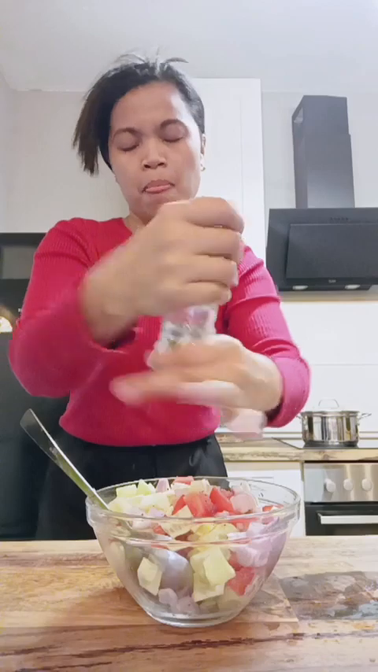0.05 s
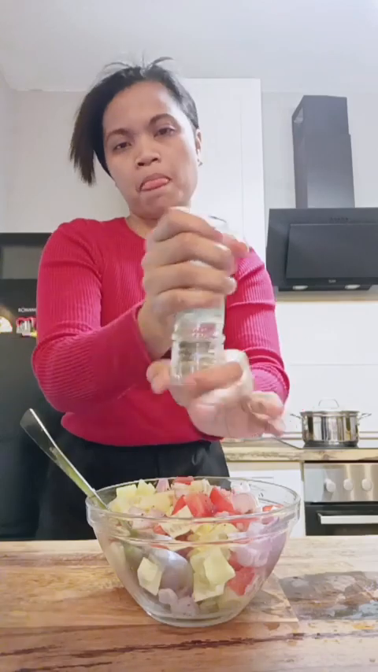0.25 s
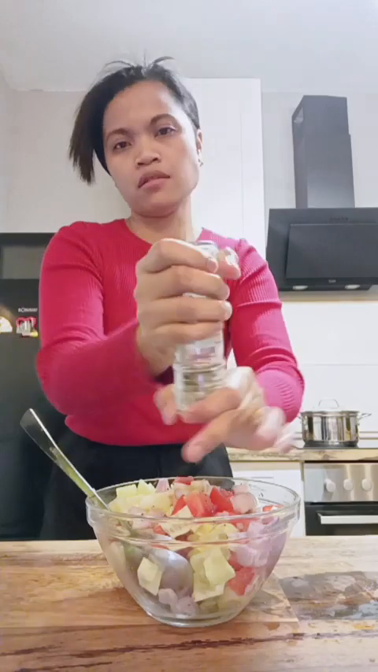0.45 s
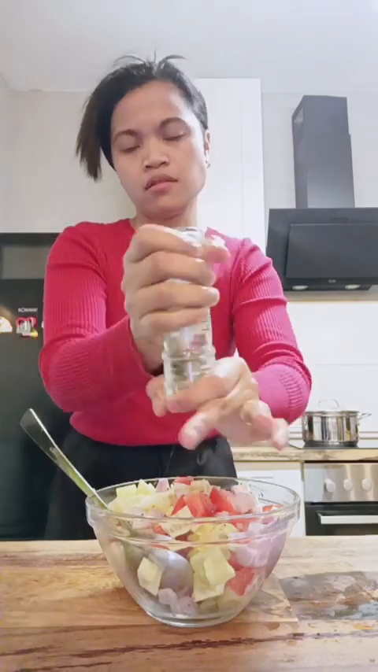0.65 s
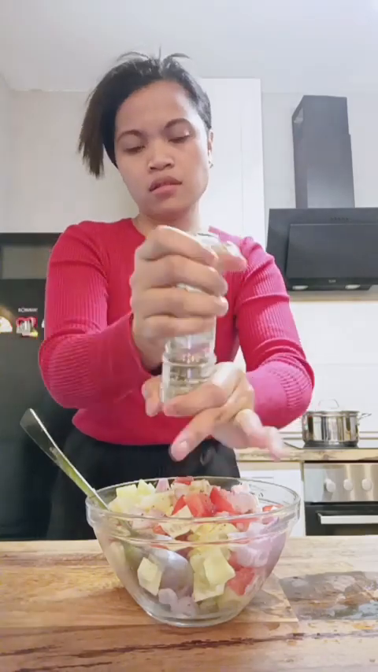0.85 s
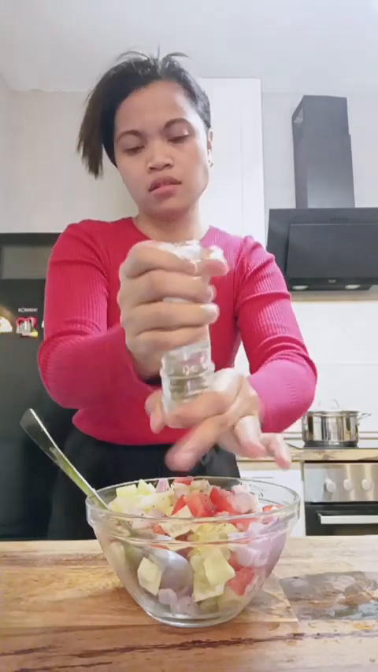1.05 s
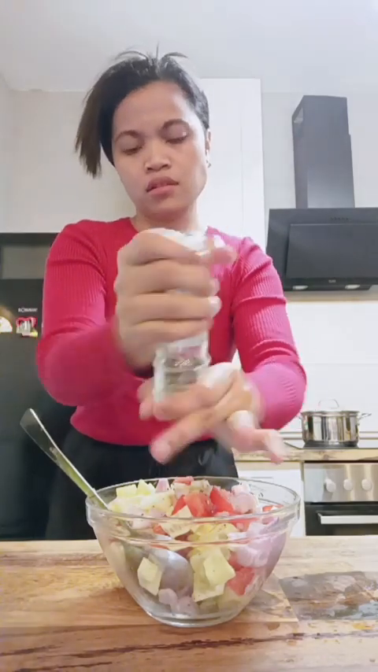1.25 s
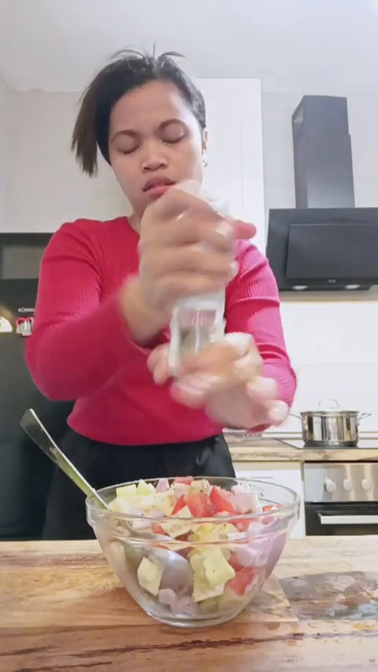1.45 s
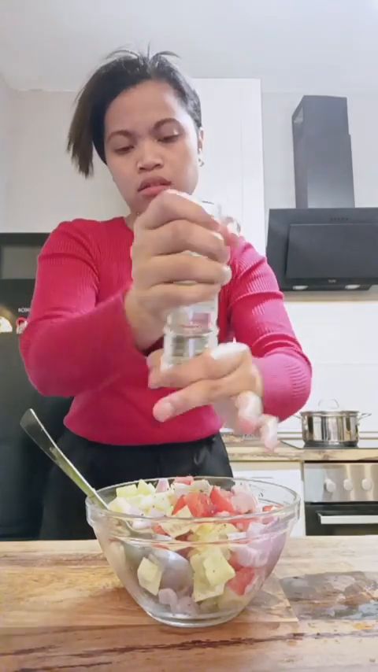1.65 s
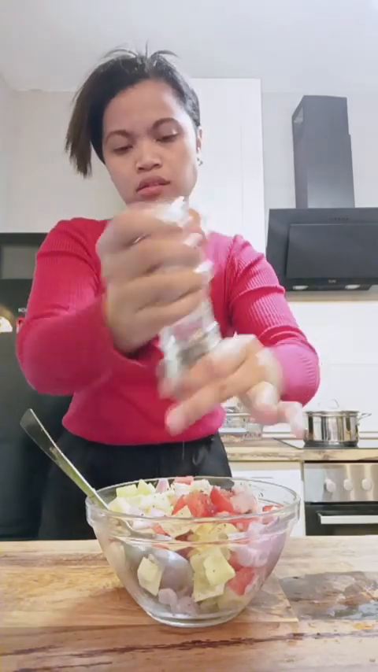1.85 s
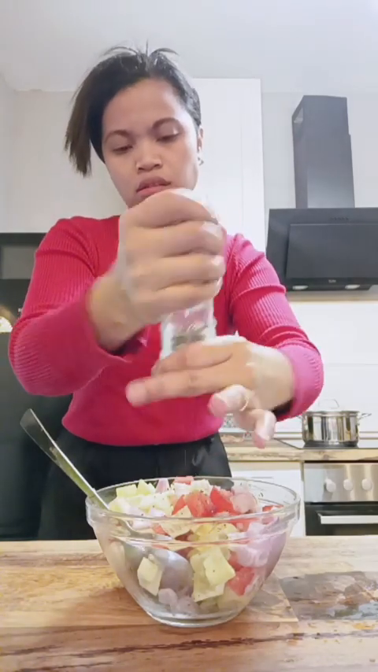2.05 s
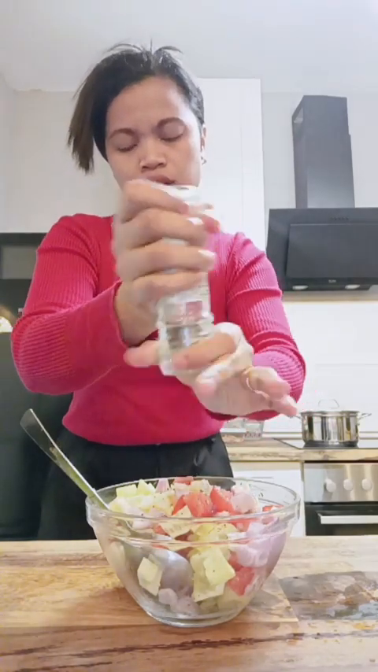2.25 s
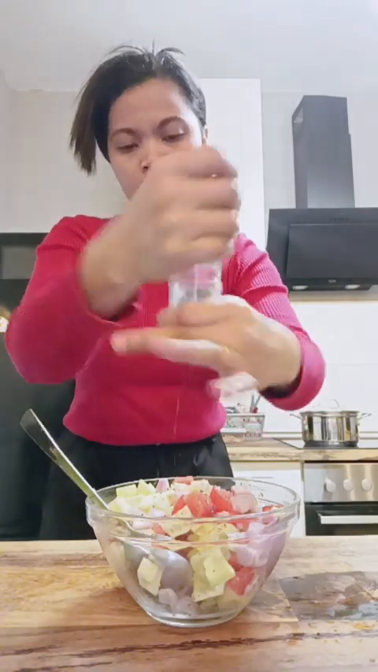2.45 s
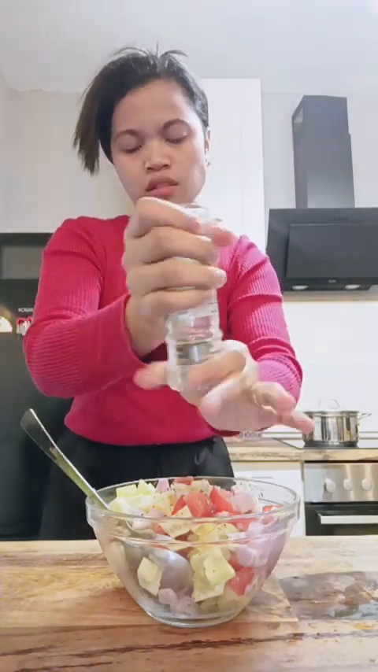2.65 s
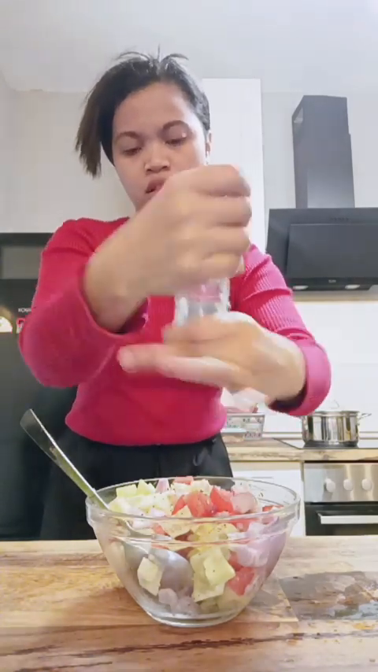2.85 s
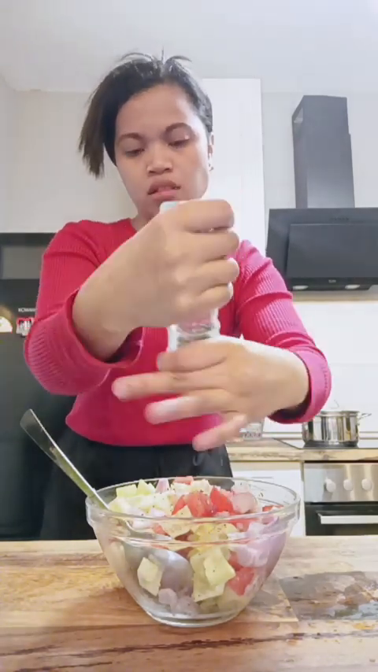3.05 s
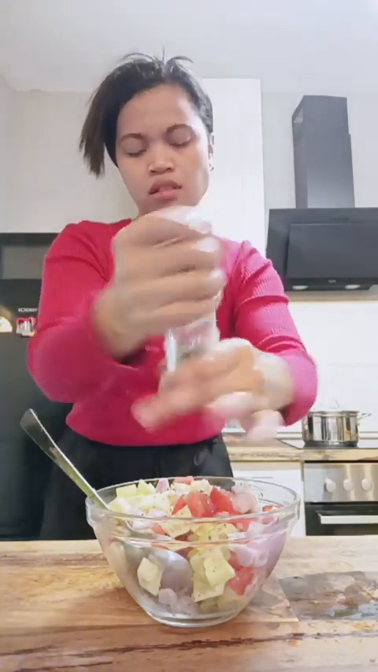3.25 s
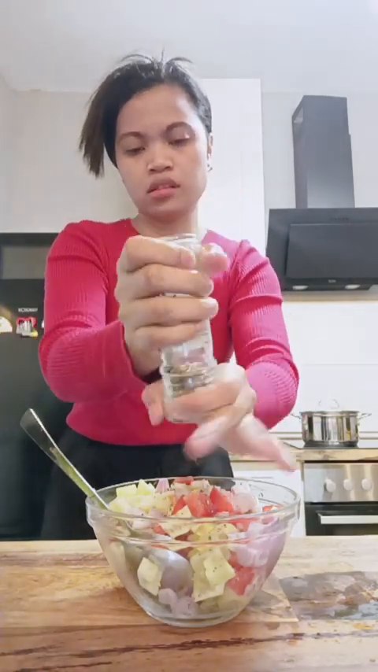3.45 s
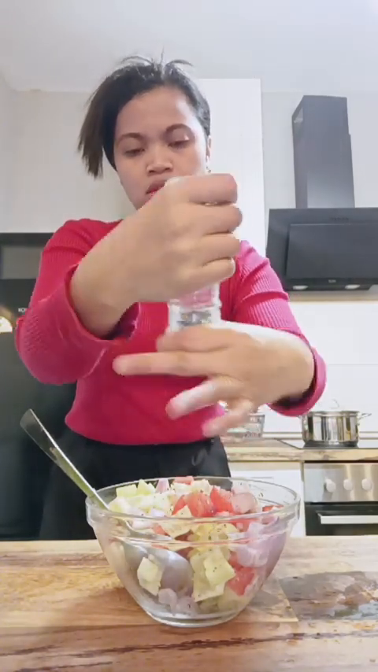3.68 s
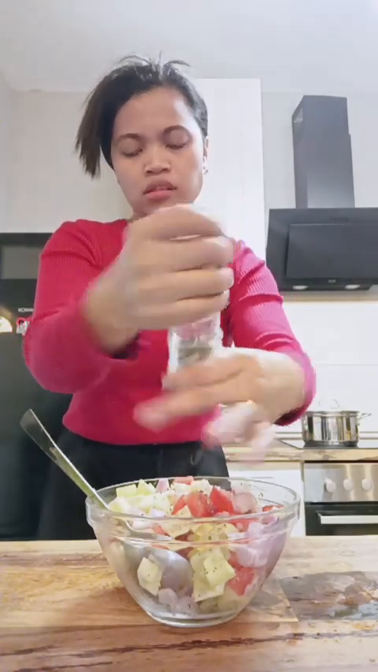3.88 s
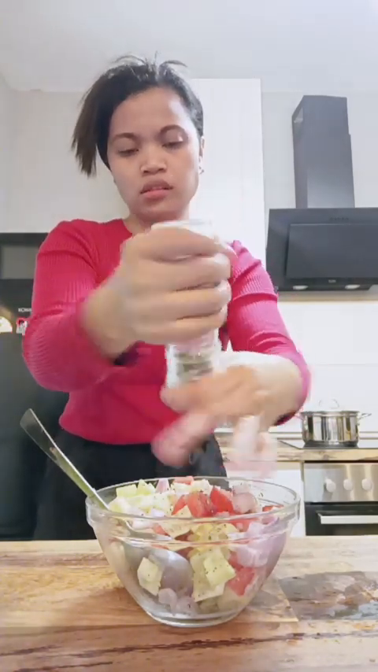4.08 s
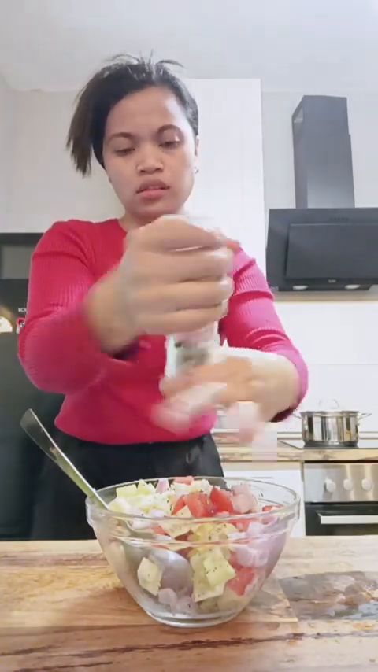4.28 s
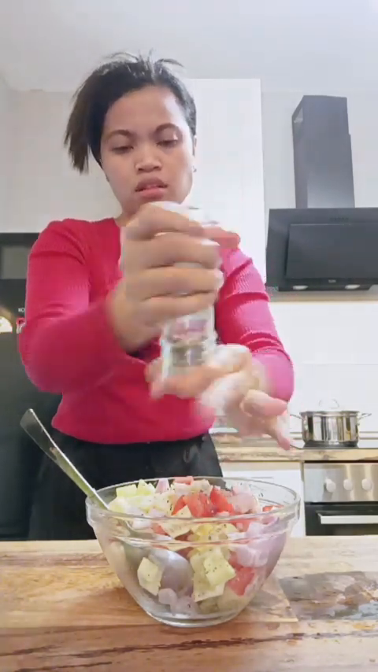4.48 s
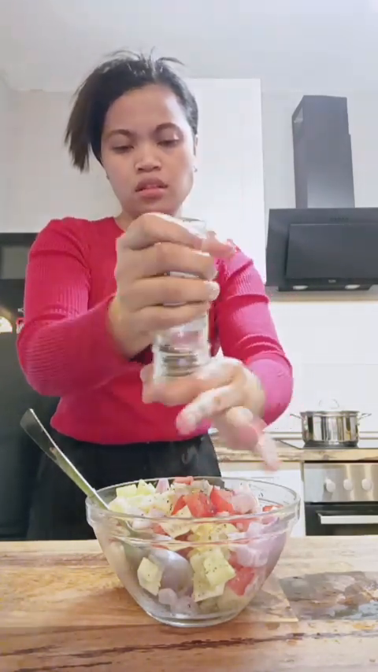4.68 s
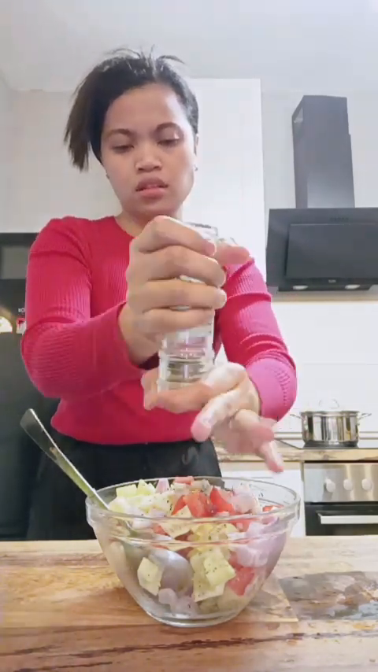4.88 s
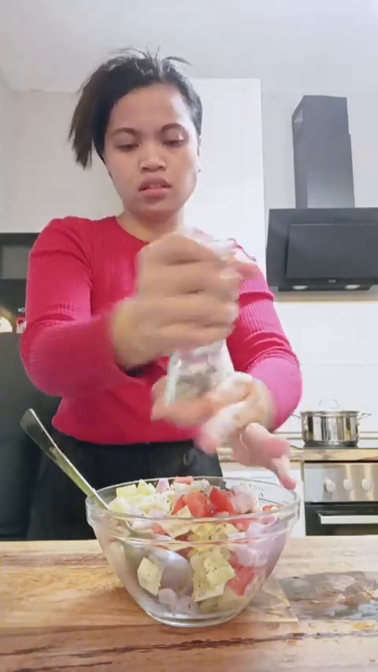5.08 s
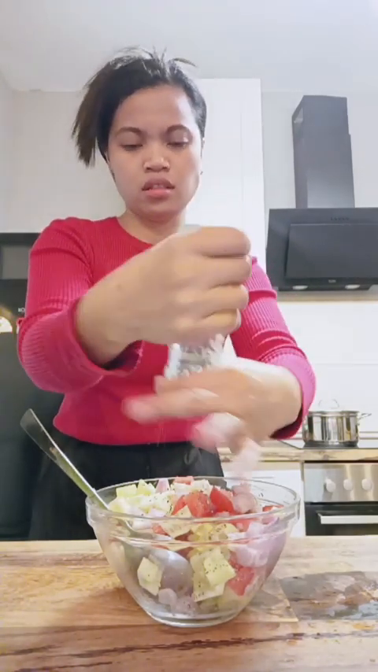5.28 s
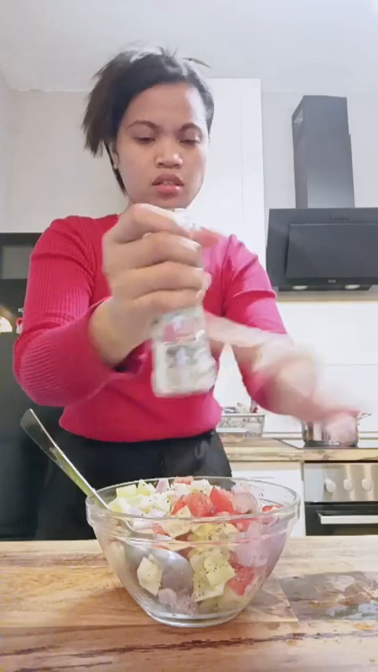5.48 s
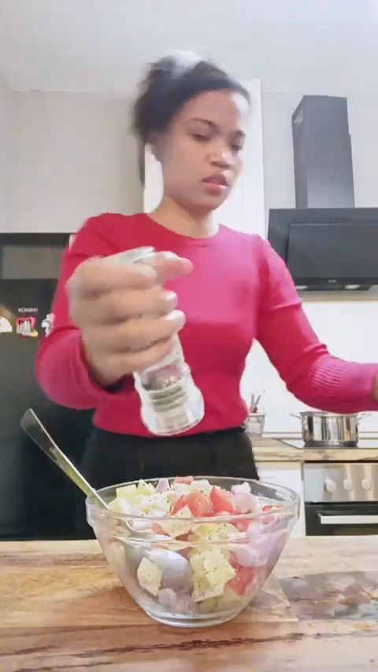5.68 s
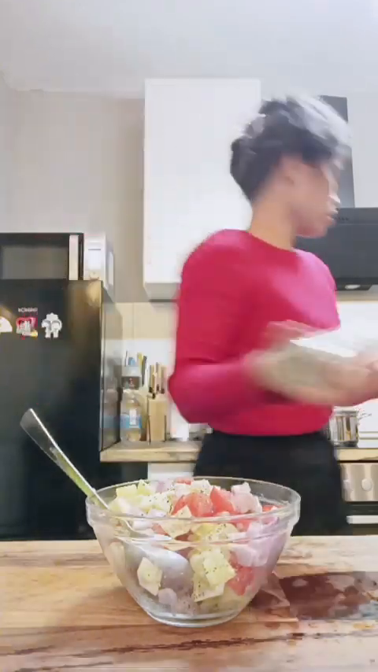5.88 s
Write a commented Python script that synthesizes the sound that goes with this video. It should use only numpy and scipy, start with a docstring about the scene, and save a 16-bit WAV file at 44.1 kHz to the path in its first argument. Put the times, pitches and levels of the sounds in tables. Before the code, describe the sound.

A hand pepper grinder twists back and forth in a kitchen, about an arm's length from a stereo microphone. Sharp dry cracks come in uneven clusters with fine gritty crunching between them and faint dull bumps of the hand beneath. After about five and a half seconds the grinding stops and loose peppercorns rattle brightly in the jar. Short hard room echo, very quiet background air.

```python
"""Peppercorns crackle, crack and splinter as a small pepper mill is twisted back and forth over a bowl in a kitchen.
The burr mills their crumbs in short bites, and the hard room answers; late on, loose corns slide in the jar.
Corns are noise snaps with resonances; crumbs, grit and slides are showers of tiny snaps, all under gain curves.
Dull bumps, thuds and hand brushes are damped noise resonances, jolts band-limited pulses, rub and air coloured noise.
Two microphone ports an arm's length away hear it all."""
import sys
import numpy as np
from scipy import signal
from scipy.fft import rfft, irfft
from scipy.io import wavfile
from scipy.ndimage import uniform_filter1d

SR = 44100
rng = np.random.default_rng(int(sys.argv[2]) if len(sys.argv) > 2 else 0)


def transcribe(u):
    """Save the signal u as a 16-bit wav file named by the first command-line argument.

    u: samples, shape (n,) or (channels, n), limited to [-1, 1]; the rate is SR.
    q: integer samples, one column per channel.
    """
    v = np.clip(np.atleast_2d(u).T, -1, 1)
    q = np.round(v * 32767).astype(np.int16)
    wavfile.write(sys.argv[1], SR, q)


N = 261072

# breaking peppercorns, relative levels: [t/s, level/dB, low body/dB, treble/dB, pitch f/Hz]
CORN_BREAKS = [(0.111, -43, 6, -6, 2080), (0.121, -36, -14.5, -12, 1760), (0.126, -29.5, 8, 4, 1890),
               (0.302, -38.5, -6, 9, 2260), (0.311, -33, 5.5, -1, 2010), (0.331, -45, -9.5, -5, 2100),
               (0.35, -23.5, 9.5, 5, 2040), (0.37, -33.5, 7, 10, 1470), (0.444, -30, -8.5, 1.5, 1560),
               (0.466, -21, -3, -1, 3230), (0.478, -26.5, 2.5, -6, 2320), (0.484, -22.5, -4.5, 1, 3430),
               (0.636, -30, 12, 3, 2230), (0.647, -24.5, 3, -6, 2280), (0.652, -25, -26.5, -14.5, 3270),
               (0.661, -30.5, 20, 10, 3450), (0.676, -35.5, 10.5, 24, 2270), (0.694, -22, -22, 3, 1880),
               (0.772, -30.5, 12, -4, 1480), (0.781, -36.5, -2, -5, 1700), (0.846, -20.5, -0.5, -2, 2020),
               (0.864, -31, 0.5, -4, 2120), (0.871, -37, -18, 2, 2280), (0.878, -23, 0.5, 11.5, 2360),
               (0.96, -39, 10.5, -15, 1820), (0.979, -22, 8.5, 2.5, 3010), (1.08, -26, 7.5, -8, 2240),
               (1.092, -31, 11.5, -2, 2210), (1.102, -33.5, -3.5, 8, 2020), (1.167, -38.5, 12, 1, 2020),
               (1.19, -25.5, 2, -3.5, 2350), (1.261, -30, 8, 1, 1420), (1.286, -21, -25, -7, 3430),
               (1.299, -23.5, 4, 2, 3620), (1.313, -30.5, 0, -0.5, 2330), (1.471, -29, -3, -8, 2160),
               (1.523, -32, 6.5, -1, 2030), (1.554, -29.5, -1.5, -5, 1490), (1.628, -38.5, -18, 6, 2400),
               (1.645, -22, 1, -8.5, 1580), (1.654, -22, 1, 4.5, 1700), (1.663, -34.5, -14.5, -27.5, 1650),
               (1.684, -23, 2, 7, 2230), (1.753, -31, -11, -1, 3560), (1.789, -24.5, -5, 6.5, 3520),
               (1.798, -29.5, 1, -3, 1940), (1.867, -23, 2, -3, 1710), (1.87, -26, -9, 14.5, 1670),
               (1.891, -28, -8, 4, 1850), (1.968, -34.5, -29, 3, 2150), (1.984, -37, -25, -9, 1950),
               (1.998, -34.5, 1.5, -22, 3120), (2.006, -21, 1.5, -2, 2240), (2.072, -27, -6, 0.5, 2900),
               (2.087, -32.5, 9, 2, 2200), (2.3549, -22.5, -26.5, -2, 2340), (2.358, -25.5, 5, 3.5, 2520),
               (2.489, -28.5, -2, -5, 1510), (2.495, -27, 2.5, -4, 3270), (2.502, -26, -14, 2, 5700),
               (2.5188, -23.5, 0, -13, 1770), (2.5242, -24, 6.5, 4, 2300), (2.529, -20, 7.5, -1, 2300),
               (2.747, -27, -8, 1.5, 3420), (2.758, -32.5, 7, 4, 2180), (2.778, -30.5, 17, 2, 2030),
               (2.783, -30, 10, -6, 2130), (2.795, -37, -7, 12, 2040), (2.821, -48, 14, -8, 1580),
               (2.904, -41, 0, 3, 2200), (2.908, -21, -12, 6, 3640), (2.937, -24.5, 2, 1.5, 1480),
               (2.945, -32, -14, -3, 3200), (2.978, -27.5, 7.5, 4.5, 3320), (3.087, -41, 7, 8, 2080),
               (3.114, -36, 4, -1, 1980), (3.166, -26, -3, -4, 2030), (3.171, -26, -11, 13.5, 2080),
               (3.19, -29, 13.5, 0, 2000), (3.202, -33, 9, -15, 2100), (3.22, -34.5, 5, 7, 1520),
               (3.278, -34.5, -23, -7, 2230), (3.311, -35, 12, 5, 2150), (3.403, -49, -26, 10, 2200),
               (3.421, -20, 5, -2.5, 1790), (3.428, -36, 4, 0, 1600), (3.436, -33.5, -41, 14, 1880),
               (3.441, -47, 1, 12, 2090), (3.623, -37.5, -20, 4, 2360), (3.648, -37.5, -7, -0.5, 2180),
               (3.687, -34, 9, 3, 1480), (3.722, -41, -23, 5, 2250), (3.731, -36, 2, 7, 2820),
               (3.795, -21, 2, 3, 2040), (3.803, -28, 7, 0, 1730), (3.819, -35, 7, 2, 1740),
               (3.839, -23.5, 1, -0.5, 2120), (3.897, -40, -15, -12, 1910), (3.916, -37, 14, -8, 1740),
               (4.002, -25.5, 12, -0.5, 1440), (4.008, -20.5, 4, -0.5, 3360), (4.015, -29.5, 12, 7, 2070),
               (4.021, -31, -14, 11, 2180), (4.03, -22.5, 7.5, 9.5, 2180), (4.04, -25, -22, 6.5, 2080),
               (4.132, -25.5, 3.5, 3.5, 1980), (4.202, -42, 8, -18, 2130), (4.221, -23, 6.5, -4, 3360),
               (4.225, -23, -2, 0.5, 3120), (4.24, -29, 11.5, 3.5, 2120), (4.248, -40, 4, 5, 2000),
               (4.313, -26.5, 2, 4, 2160), (4.348, -30, 8.5, 1, 1430), (4.422, -40.5, 7, -1, 2090),
               (4.444, -43, 4, 0, 2000), (4.454, -24.5, 10.5, -6.5, 2270), (4.462, -44, 6, -19, 2140),
               (4.471, -44, -5, 35.5, 2100), (4.549, -29.5, 15, 2.5, 3140), (4.63, -42, 1, 2, 2200),
               (4.638, -37, 10, 10, 2100), (4.643, -24.5, 0.5, 0, 1860), (4.66, -29.5, 5.5, -1, 2110),
               (4.675, -23, -17, 4.5, 2570), (4.75, -49, 14, 15, 1500), (4.782, -28.5, 13, 3, 2280),
               (4.883, -28, 2.5, -6, 3150), (4.904, -17.5, -4, 4.5, 3500), (4.907, -25.5, 6, 3.5, 2240),
               (4.97, -25.5, -14, 1, 2230), (5.009, -29, 9.5, -1, 2300), (5.018, -23.5, 3.5, 2, 1920),
               (5.088, -29, 0.5, -5, 1450), (5.095, -31, 0, -3, 2260), (5.106, -19.5, 4, 3.5, 2370),
               (5.121, -41, 8, -6, 2100), (5.21, -35, 0, 1, 2160), (5.234, -28.5, 14.5, 1, 3600),
               (5.258, -28, -3, 3, 1980), (5.269, -49, -5, 18, 2100), (5.324, -39, 7, -12, 3030),
               (5.342, -26, -10, 0, 3340), (5.372, -20, -33, 4, 2460), (5.401, -33, 7, 0, 2330)]


def cracks(gain_db=-0.53, strain_db=-18, strain_s=0.0045, splinter_db=-17, splinter_s=0.014):
    """Each corn breaks with its own weight, colour and pitch, ticks first if in mid-turn, and loses two splinters."""
    out, turn = np.zeros((2, N)), turning()
    for s, db, body_db, treble_db, hz in CORN_BREAKS:
        level_db = db + gain_db
        tint = crack_tint(body_db, treble_db)
        burst = crack_burst(hz, body_db, treble_db)
        add(out, s, amp(level_db) * colour(burst, tint, size=512))
        strain = amp(level_db + strain_db) * np.sqrt(turn[round(s * SR)] / turn.max())
        for lead_s in strain_s * rng.random(2):
            add(out, s - lead_s, strain * snap(decay_s=0.0015, front=0.42, same=0.6))
        for late_s in splinter_s * rng.random(2):
            splinter = colour(snap(decay_s=0.00049, front=1.8, same=1.0), tint, size=512)
            add(out, s + late_s, amp(level_db + splinter_db) * splinter)
    return mill(out)


def crack_tint(body_db, treble_db, body_share=0.97, treble_share=0.95, top_share=0.9):
    """Colour of one break as (f/Hz, dB): its body sets the lows, its treble tilts the rest."""
    low_db, high_db = body_share * body_db, treble_share * treble_db
    return [(1000, low_db - 4.0), (1700, -high_db / 2), (3400, -high_db / 2),
            (6000, high_db / 2), (12000, top_share * high_db + 7.5)]


def crack_burst(hz, body_db, treble_db, decay_s=0.0017, rattle_db=-6.5, wood_db=0.5, doubling_db=28):
    """A fracture excites the cap, a high shard ping and the barrel, and rattles the burr."""
    weight = np.clip(2 ** ((body_db - treble_db) / doubling_db), .5, 2)  # heavy breaks outlast bright ones
    burst = crack_ring(snap(decay_s * weight, front=0.6, same=0.52), hz, width_hz=280, ring_db=2)
    burst = crack_ring(burst, rng.uniform(4600, 8200), width_hz=600, ring_db=-1.5)  # shard
    burst = burst + amp(rattle_db) * min(weight, 1) * rattle(hz)
    for barrel_hz in rng.uniform([620, 1000], [900, 1600]):  # woody knocks, shifting with the grip
        burst = crack_ring(burst, barrel_hz, width_hz=70, ring_db=wood_db)
    return burst


def snap(decay_s, front, same, late_s=0.0016, size=1024):
    """A brittle fracture: a sharp front and a quick rattle, then its bounce off the table from a lower angle."""
    t = np.arange(size) / SR
    shape = np.exp(-t / decay_s) + front * np.exp(-t / .0004)
    a, b, bounce = (unit(v * shape) for v in rng.standard_normal((3, size)))
    out = pair(a, b, same, count=4)[::-1]
    add(out, late_s * rng.random(), rng.uniform(.5, 1.2) * pair(bounce, b, 1, count=14))
    return unit(out)


def crack_ring(x, hz, width_hz, ring_db):
    """A sound plus the damped resonance that it excites at one pitch."""
    b, a = signal.iirpeak(hz, max(hz / width_hz, 1), SR)
    return x + amp(ring_db) * signal.lfilter(b, a, x)


def rattle(hz):
    """The loosened burr chatters dully for a moment after a corn breaks."""
    # colour of the chatter: [f/Hz, level/dB]
    chatter_colour = [(600, 2.5), (1500, 5.5), (2600, -0.5), (4500, -1.5), (12000, -0.5)]
    chatter = snap(decay_s=.0055, front=0, same=0.86)
    chatter = crack_ring(chatter, hz * rng.uniform(.6, 1.05), width_hz=130, ring_db=7)
    return colour(chatter, chatter_colour, size=512)


def mill(x, ring_gain_db=-4.5):
    """The shell colours every snap, and the damped modes of jar and cap ring on briefly."""
    # colour of the shell: [f/Hz, level/dB]
    shell_colour = [(100, -51.5), (550, -23.5), (800, -13.5), (1150, -10.5), (1550, -4.5), (2100, 1),
                    (2700, -2.5), (3300, -4.5), (4300, -7), (5700, -1), (7400, -10), (9100, -21.5),
                    (11000, -21), (15800, -32.5)]
    # modes of jar and cap, relative levels: [f/Hz, level/dB, t60/s]
    jar_modes = [(712, -34.5, .04), (882, -34, .03), (1467, -36, .06), (1780, -38, .04), (2131, -39.5, .05),
                 (3267, -33, .015)]
    t = np.arange(SR // 4) / SR
    ring = sum(amp(db + ring_gain_db - 60 * t / t60) * np.cos(2 * np.pi * hz * t) for hz, db, t60 in jar_modes)
    return colour(x + signal.oaconvolve(x, ring[None], axes=1)[:, :N], shell_colour)


def crumbs(gain_db=-4, roam_db=2.0, even_hz=7000, count=9):
    """The burr mills fragments in short bites; their colour roams as they shift, under a more even fizz."""
    # bites of the burr, relative levels: [start t/s, length/s, level/dB]
    burr_bites = [(0, 0.02, -32.5), (.105, 0.022, -30), (.333, 0.023, -33), (.493, 0.072, -27),
                  (.64, 0.0035, -30), (.705, 0.068, -30.5), (.838, 0.016, -37), (.925, 0.05, -38),
                  (1.06, 0.037, -24), (1.26, 0.083, -35.5), (1.34, 0.053, -37.5), (1.5, 0.057, -38),
                  (1.858, .006, -40), (1.876, 0.04, -27.5), (2.07, 0.012, -38), (2.16, 0.011, -50),
                  (2.385, 0.036, -38), (2.655, 0.054, -54), (2.925, 0.018, -30), (3.045, 0.072, -38),
                  (3.155, 0.034, -28), (3.325, 0.028, -35.5), (3.414, .008, -31), (3.46, 0.046, -27),
                  (3.52, 0.05, -40), (3.67, 0.079, -33.5), (3.81, 0.013, -44), (3.91, 0.039, -31.5),
                  (3.985, .008, -44), (4.05, 0.082, -40), (4.43, 0.017, -29), (4.5, 0.053, -37.5),
                  (4.555, 0.046, -34.5), (4.665, 0.11, -28), (4.875, 0.014, -30.5), (4.935, 0.061, -31),
                  (5.125, 0.055, -29.5), (5.221, 0.014, -22), (5.35, 0.053, -31.5)]
    crumb_colour = [(600, 1), (1200, 3.5), (2000, 0.5), (2800, -2.0), (4000, -7), (8000, 2), (13000, 8.0)]
    shower = mill(grains(per_s=800, spread_db=4, decay_s=.0006, ring_db=7.5, clump_db=4))
    hz, t, z = signal.stft(shower, SR, nperseg=512)
    roam = uniform_filter1d(rng.standard_normal(z.shape[1:]), size=6, axis=0)
    roam = unit(uniform_filter1d(roam, size=count, axis=1))
    roam_gain = amp(roam_db * roam / (1 + (hz[:, None] / even_hz) ** 2))
    shower = signal.istft(z * roam_gain, SR, nperseg=512)[1][:, :N]
    gain = np.hypot(swells(burr_bites, rise_s=0.004, release_s=0.006), straining())
    return amp(gain_db) * gain * unit(colour(shower, crumb_colour))


def straining(build_db=-4, build_s=0.005):
    """Gain over time of the crackle that builds in each corn just before it cracks in mid-turn."""
    gain, t = np.zeros(N), np.arange(SR // 10) / SR
    for s, db, *_ in CORN_BREAKS:
        add(gain, s - t[-1], amp(db + build_db) * np.exp(-t[::-1] / build_s))
    turn = turning()
    return gain * np.sqrt(turn / turn.max())


def grains(per_s, spread_db, decay_s, ring_db, clump_db, count=28, size=400):
    """A clumped shower of tiny snaps of count pitches, a few much larger than the rest."""
    clumps = unit(uniform_filter1d(rng.standard_normal(N), size=size))
    size_db = spread_db * np.minimum(rng.exponential(1, N), 3) + clump_db * np.minimum(clumps, 1)
    sizes = amp(size_db) * (rng.random(N) < per_s / SR)
    kind = rng.integers(0, count, N)
    shower = np.zeros((2, N))
    for k, hz in enumerate(np.geomspace(900, 7000, count)):
        one = crack_ring(snap(decay_s, front=0.24, same=0.21), hz, hz / 10, ring_db)
        shower += signal.oaconvolve((sizes * (kind == k))[None], one, axes=1)[:, :N]
    return shower


def grit(gain_db=-2):
    """Sparse small ticks as husks catch on the turning burr."""
    ticks = mill(grains(per_s=130, spread_db=10, decay_s=0.0015, ring_db=10, clump_db=7))
    return amp(gain_db) * turning() * unit(ticks)


def turning():
    """Gain over time of the light sounds that last as long as the wrist turns."""
    # turns of the wrist, relative levels: [start t/s, length/s, level/dB]
    wrist_turns = [(.315, 1.14, -50.5), (1.49, 0.58, -48.5), (2.89, 0.75, -49.5), (3.62, 0.57, -49.5),
                   (4.42, 0.454, -47.5), (4.87, 0.46, -51), (5.34, 0.15, -45)]
    return swells(wrist_turns, rise_s=0.0045, release_s=0.021)


def loose_corns(gain_db=-3.5):
    """Whole corns tumble along the jar wall: a dense, light and bright shower."""
    # slides of corns, relative levels: [start t/s, length/s, level/dB]
    corn_slides = [(2.232, 0.014, -73.5), (2.303, 0.0028, -62), (5.545, 0.0065, -48), (5.558, 0.01, -45.5),
                   (5.572, 0.019, -35), (5.595, 0.14, -53), (5.62, 0.026, -41.5), (5.646, 0.021, -35),
                   (5.7, 0.0054, -35), (5.718, 0.014, -33), (5.752, 0.0031, -47), (5.774, 0.0033, -42),
                   (5.857, 0.017, -53.5), (5.881, 0.033, -52)]
    # colour of corns on the jar wall: [f/Hz, level/dB]
    wall_colour = [(300, -15), (1000, -18.5), (1800, -9), (2900, 5), (4400, 1.5), (6000, 8), (9000, -2),
                   (12000, 0), (16000, -5.5)]
    shower = grains(per_s=3400, spread_db=3.5, decay_s=0.0019, ring_db=-2, clump_db=1.5)
    gain = swells(corn_slides, rise_s=0.005, release_s=0.005)
    return amp(gain_db) * gain * unit(colour(shower, wall_colour))


def low_knocks(jolt_db=1, bump_db=0, thud_db=0.0):
    """Jolts, bumps, thuds and brushes of the hand, low and soft under the cracks."""
    # the mill jolts in the hand as a corn gives way, relative levels: [t/s, level/dB]
    hand_jolts = [(0.483, -33.5), (0.694, -49), (0.879, -44.5), (1.302, -40), (1.868, -44.5), (4.028, -50),
                  (4.685, -45.5), (4.904, -23), (5.105, -35)]
    # dull hollow bumps, relative levels: [t/s, level/dB, pitch f/Hz]
    hollow_bumps = [(0.966, -42, 388), (1.015, -43.5, 375), (1.087, -44.5, 344), (1.657, -44, 325),
                    (1.815, -52, 387), (2.096, -52, 360), (2.145, -56.5, 384), (2.275, -64.5, 392),
                    (2.521, -49, 324), (2.653, -50, 427), (3.084, -53.5, 340), (3.225, -54, 380),
                    (3.282, -48, 356), (3.299, -35.5, 330), (3.538, -56, 383), (3.803, -41, 315),
                    (4.056, -43, 337), (4.327, -44.5, 395), (4.351, -43.5, 343), (4.561, -46.5, 399),
                    (4.731, -46, 404), (5.263, -45, 328), (5.322, -40.5, 326), (5.697, -43.5, 363)]
    # soft deep thuds, relative levels: [t/s, level/dB]
    palm_thuds = [(0.324, -53.5), (1.075, -56), (2.134, -59), (2.385, -52.5), (2.816, -52.5), (3.021, -59),
                  (3.135, -56.5), (3.39, -53), (4.19, -54), (4.326, -53.5)]
    # the hand brushes the mill in a new grip and as it carries it off, relative levels: [t/s, level/dB, pitch f/Hz]
    hand_brushes = [(2.285, -69, 1210), (5.881, -54, 980)]
    out = np.zeros(N)
    for s, db in hand_jolts:
        add(out, s, amp(db + jolt_db) * jolt(low_hz=49.0, high_hz=223))
    for s, db, hz in hollow_bumps:
        add(out, s, amp(db + bump_db) * knock(hz, width_hz=115, rise_s=0.016, decay_s=0.021))
    for s, db in palm_thuds:
        add(out, s, amp(db + thud_db) * thud(hz=130, width_hz=55, length_s=.13))
    for s, db, hz in hand_brushes:
        add(out, s, amp(db) * knock(hz, width_hz=580, rise_s=0.0076, decay_s=0.018))
    return np.array([out, out * amp(1.5)])


def jolt(low_hz, high_hz, size=4096):
    """One short push of air with hardly any ring: a band-limited impulse, peak 1."""
    band = signal.butter(2, [low_hz, high_hz], "bandpass", fs=SR, output="sos")
    push = signal.sosfilt(band, signal.unit_impulse(size))
    return push / abs(push).max()


def knock(hz, width_hz, rise_s, decay_s, size=8192):
    """A soft blow into one heavily damped resonance, peak of its envelope 1."""
    t, f = np.arange(size) / SR, np.fft.rfftfreq(size, 1 / SR)
    resonance = 1 / (1 + (2 * (f - hz) / width_hz) ** 4)
    wave = signal.hilbert(irfft(rfft(rng.standard_normal(size)) * resonance))
    steadied = wave / np.sqrt(abs(wave) + 1e-9)  # halves the envelope's swings in dB
    blow = steadied * (1 - np.exp(-t / rise_s)) * np.exp(-t / decay_s)
    return blow.real / abs(blow).max()


def thud(hz, width_hz, length_s):
    """A soft push of the palm: a dull rumble that swells and fades, peak 1."""
    size = round(length_s * SR)
    band = signal.butter(2, [hz - width_hz / 2, hz + width_hz / 2], "bandpass", fs=SR, output="sos")
    wave = signal.hilbert(signal.sosfilt(band, rng.standard_normal(2 * size)))[size:]
    push = (wave / np.sqrt(abs(wave) + 1e-9)).real * np.hanning(size)
    return push / abs(push).max()


def palms(gain_db=-20, waver_db=3):
    """A low uneven rub of skin on the barrel while it turns: coloured noise with a wavering level."""
    # spectral shape of the rub: [f/Hz, density/dB]
    rub_colour = [(25, -27.5), (60, -16), (130, 2), (210, -17), (370, 4), (550, -6.5), (900, -38.5),
                  (2000, -47)]
    waver = unit(uniform_filter1d(rng.standard_normal(N), size=2500))
    rub = colour(pair(*rng.standard_normal((2, N)), same=0.85), rub_colour)
    return amp(gain_db + waver_db * waver) * turning() * unit(rub)


def kitchen(x, sway_hz=1.286, count=3):
    """The echo pattern shifts as the mill sways: feeds fade in turn into different tails."""
    turn = np.pi * sway_hz * np.arange(N) / SR
    feeds = (np.sqrt(2 / count) * np.cos(turn + np.pi * k / count) for k in range(count))
    return sum(signal.oaconvolve(x * feed, room_tail(), axes=1)[:, :N] for feed in feeds)


def room_tail(early_db=-12, build_s=.022):
    """Bowl and table throw back two quick echoes; walls and cupboards add a short tail that takes time to build."""
    # reverberation of the kitchen: [f/Hz, t60/s]
    reverb_times = [(150, .3), (700, .27), (1800, .265), (5500, .24), (9000, .2), (15000, .17)]
    size = SR // 2
    taps = rng.standard_normal((2, size)) * (rng.random((2, size)) < 5000 / SR)
    hz, t, z = signal.stft(taps, SR, nperseg=256)
    tail = signal.istft(z * amp(-60 * t / read(reverb_times, hz)[:, None]), SR, nperseg=256)[1]
    tail *= np.clip(np.arange(tail.shape[1]) / SR / build_s, 0, 1)
    tail /= np.linalg.norm(tail, axis=1, keepdims=True)
    for delay_s in (.009, .0172):
        add(tail, delay_s, amp(early_db) * np.ones((2, 1)))
    return tail


def room_tone(gain_db=-70, waver_db=2):
    """A faint low murmur of air that wavers a little: coloured noise."""
    # spectral shape of the quiet room: [f/Hz, density/dB]
    air_colour = [(25, -20), (60, -12), (130, -6), (210, -8), (370, 0), (600, -15), (1150, -21),
                  (1800, -32), (8000, -44), (16000, -50)]
    waver = unit(uniform_filter1d(rng.standard_normal(N), size=4000))
    air = colour(pair(*rng.standard_normal((2, N)), same=1.0), air_colour)
    return amp(gain_db + waver_db * waver) * unit(air)


def close_ports(x, below_hz=750):
    """Long waves reach both microphone ports alike, so their low difference is removed."""
    low = signal.butter(2, below_hz, fs=SR, output="sos")
    side = signal.sosfiltfilt(low, (x[0] - x[1]) / 2)
    return x - np.array([side, -side])


def pair(a, b, same, count=14):
    """Two ports hear partly the same wave; its share in the second is count samples later."""
    same = np.clip(same, 0, 1)
    late = np.pad(a, (count, 0))[:len(a)]
    return np.array([a, same * late + np.sqrt(1 - same ** 2) * b])


def swells(rows, rise_s, release_s):
    """Gain over time: each (start/s, length/s, dB) row rises towards its level and dies away after its length."""
    gain = np.zeros(N)
    for s, length, db in rows:
        t = np.arange(0, length + 10 * release_s, 1 / SR)
        release = np.exp(-np.maximum(t - length, 0) / release_s)
        add(gain, s, amp(db) * np.minimum(t / rise_s, 1) * release)
    return gain


def colour(x, points, share=1, size=2048):
    """Causal minimum-phase filter that follows a (f/Hz, dB) table, or a share of it."""
    log_gain = np.log(amp(share * read(points, abs(np.fft.fftfreq(size, 1 / SR)))))
    taps = np.fft.ifft(np.exp(np.conj(signal.hilbert(log_gain)))).real[:size // 2]
    return signal.oaconvolve(np.atleast_2d(x), taps[None], axes=1)[:, :x.shape[-1]]


def read(points, hz):
    """A table joined by straight lines on a log-frequency axis."""
    f, value = np.transpose(points)
    return np.interp(np.log(hz + 1), np.log(f + 1), value)


def add(mix, s, sound):
    """Mixes a sound in at time s."""
    part = mix[..., max(round(s * SR), 0):][..., :sound.shape[-1]]
    part += sound[..., :part.shape[-1]]


def amp(db):
    """Decibels to gain."""
    return 10 ** (np.asarray(db) / 20)


def unit(x):
    """Scales to rms 1."""
    return x / np.sqrt(np.mean(x ** 2) + 1e-20)


def scene(crack_wet_db=-8.5, crumb_wet_db=-6.5, slide_wet_db=-10, knock_wet_db=-17):
    """The mill in its room, over the low sounds; hard cracks beam forward and stir the room less than crumbs."""
    hard, fine, slides, low = cracks(), crumbs() + grit(), loose_corns(), low_knocks()
    to_room = amp(crack_wet_db) * hard + amp(crumb_wet_db) * fine
    to_room = to_room + amp(slide_wet_db) * slides + amp(knock_wet_db) * low
    return hard + fine + slides + low + kitchen(to_room) + palms() + room_tone()


def record(dry, edge_hz=15900):
    """Each microphone port has its own colour; then a low-pass limits the band."""
    # colour of the two ports: [f/Hz, left/dB, right/dB]
    port_colours = [(100, 1, -4.5), (330, 0.5, -2), (800, 1.5, -3), (1110, 3, -4), (1560, -1, 0),
                    (2000, 0.5, -2), (3300, -0.5, -1), (4500, 0.5, 1), (5800, 0.5, 0), (7000, -3.5, 3),
                    (7800, -2.5, 5), (8900, 3.5, 3), (9800, 12, -2), (11100, 10, -1.5), (15000, 9, -8)]
    hz, *ports_db = np.transpose(port_colours)
    ported = [colour(x, np.transpose([hz, db])) for x, db in zip(close_ports(dry), ports_db)]
    low_pass = signal.firwin(255, edge_hz, window=("kaiser", 9), fs=SR)
    return signal.oaconvolve(np.vstack(ported), low_pass[None], "same", axes=1)


dry = scene()
out = record(dry)
transcribe(out)
```